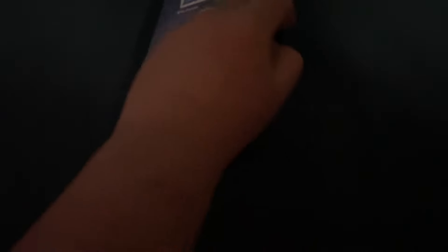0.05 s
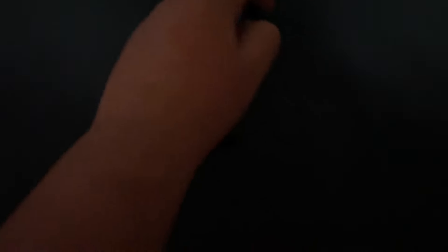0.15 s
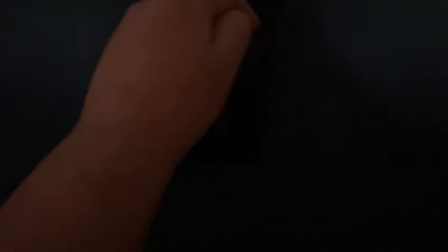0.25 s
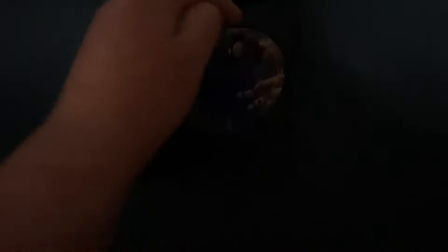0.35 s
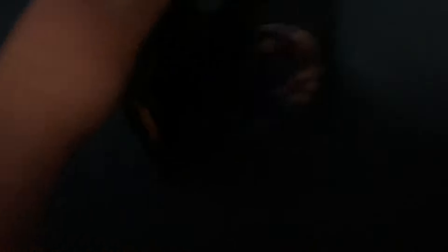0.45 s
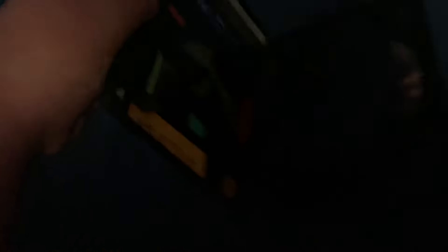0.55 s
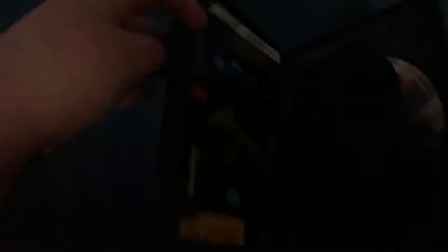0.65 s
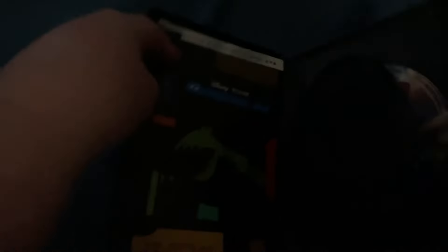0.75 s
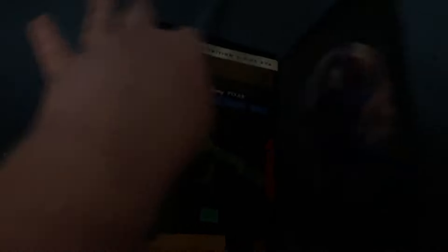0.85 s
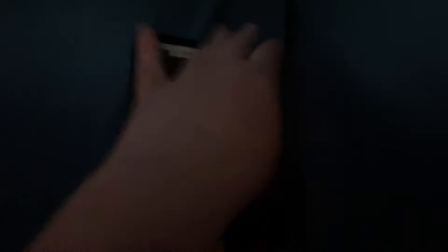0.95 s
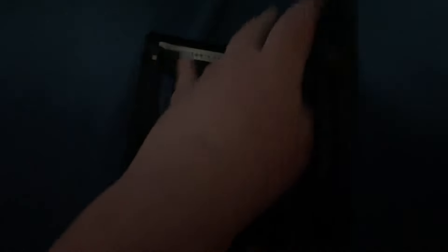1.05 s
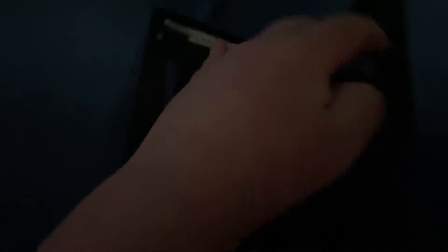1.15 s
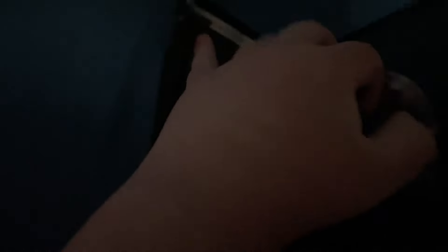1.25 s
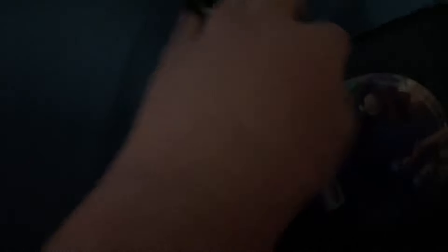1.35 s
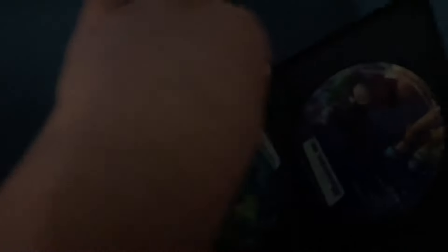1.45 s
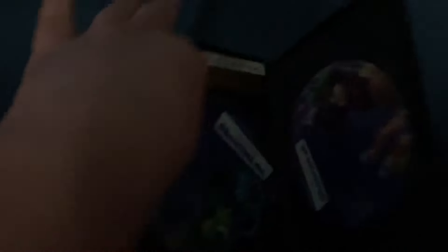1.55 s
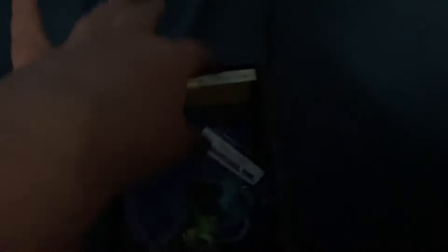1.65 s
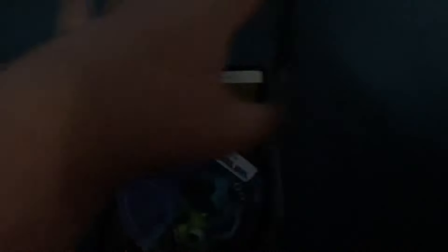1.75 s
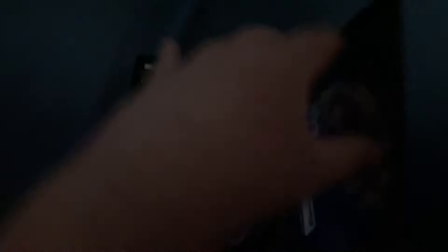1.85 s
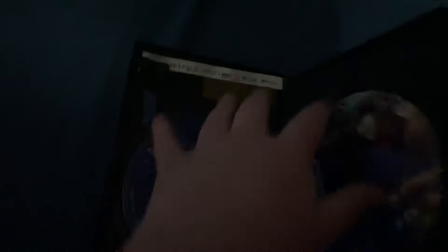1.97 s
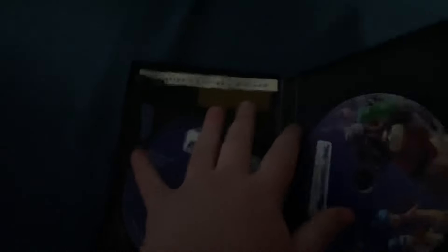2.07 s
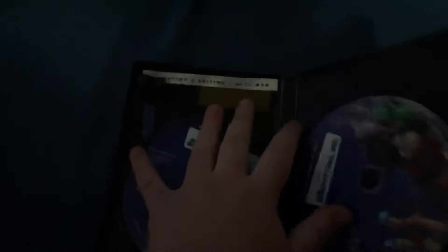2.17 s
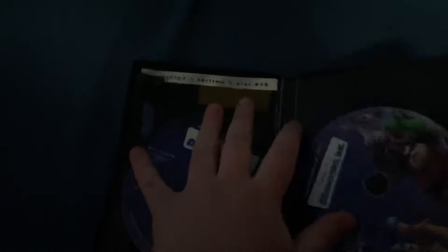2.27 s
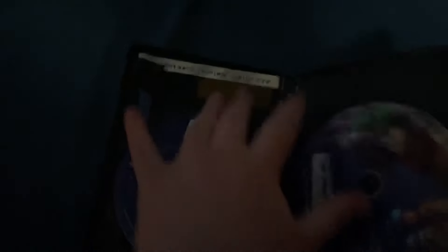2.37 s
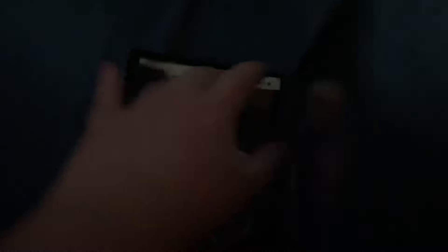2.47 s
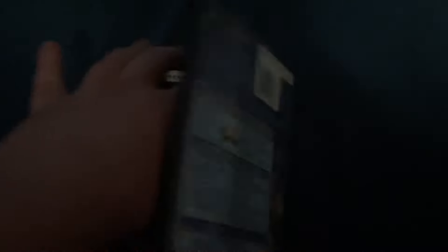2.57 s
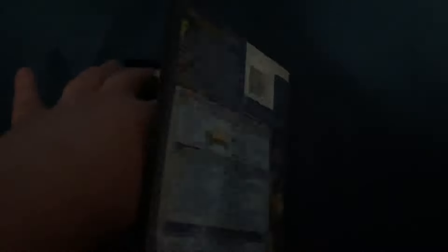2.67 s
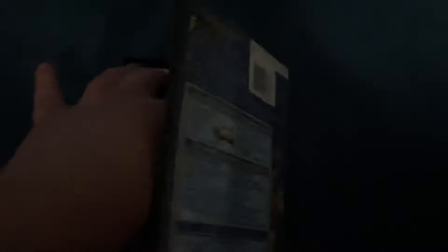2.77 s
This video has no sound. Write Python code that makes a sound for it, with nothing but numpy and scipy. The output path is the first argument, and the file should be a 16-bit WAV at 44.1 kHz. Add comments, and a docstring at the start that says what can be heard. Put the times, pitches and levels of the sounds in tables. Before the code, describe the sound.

Plastic disc case snapped open and handled up close, with sharp clicks, rattles and soft rubbing

```python
"""Opening and handling a plastic disc case close to a stereo camera in a quiet room.
From the outset filtered noise gives microphone hiss, a sine whines faintly at the top of hearing,
and slip-modulated noise is skin rubbing on plastic over a low rumble of the grip.
The latch and hub snaps, knocks and rattles follow as noise-driven shell modes, with damped thuds
and rough scrapes; after one second bright fluttering noise is fingers sliding over the sleeve."""
import sys
import numpy as np
from scipy import signal
from scipy.fft import rfft, irfft
from scipy.io import wavfile
from scipy.ndimage import uniform_filter1d

SR = 44100
rng = np.random.default_rng(int(sys.argv[2]) if len(sys.argv) > 2 else 0)


def linear_from_db(decibels):
    """Turn decibels (scalar or array-like) into linear amplitude factors; 0 gives 1."""
    return 10 ** (np.asarray(decibels, float) / 20)


def generate_wav(signal):
    """Clip the signal to [-1, 1] and save it as 16-bit WAV at the path in sys.argv[1]."""
    frames = np.transpose(np.atleast_2d(signal))
    scaled = np.clip(frames, -1, 1) * 32767
    pcm = np.round(scaled).astype(np.int16)
    wavfile.write(sys.argv[1], SR, pcm)


N = 125685  # samples

# Microphone hiss: spectral density [f/Hz, relative level/dB]
HISS_SPECTRUM = [(30, -32), (81, -15), (200, -8.5), (448, -23.5), (800, -11), (1560, -21.5), (2250, -1.5),
                 (3150, -18.5), (6900, -16), (8300, -21.5), (10000, -19), (12500, -26.5), (13500, -49.5),
                 (20000, -85)]
# Hiss likeness of left and right, limited to -1..1 in use [f/Hz, correlation]
HISS_LIKENESS = [(60, -0.28), (240, 0.96), (950, -1.4), (3770, -0.48), (15000, -0.13)]
HISS_DB = -66  # rms
# Screen whine as the hand shades it [t/s, left rms level/dB, right rms level/dB]
WHINE_LEVELS = [(0, -58, -53.5), (.3, -48.5, -49), (1.2, -49.5, -49.5), (1.5, -59, -59.5),
                (2.0, -53.5, -53.5), (2.5, -66, -63.5), (2.7, -54, -54), (2.76, -76, -70), (2.85, -55, -58)]
WHINE_HZ, WHINE_LEAD_RAD = 15734, 2.4  # the left leads the right

# Hand noise likeness of left and right [f/Hz, correlation]
HAND_LIKENESS = [(60, 0.89), (400, 0.1), (1500, 0.59), (8000, 0.34)]
# Low grip movement [t/s, level/dB]
GRIP_LEVELS = [(0.0, -87.5), (0.27, -81.5), (0.4, -60.5), (0.44, -60), (0.6, -54.5), (0.73, -54.5),
               (0.83, -74.5), (0.96, -58), (1.01, -96.5), (1.11, -68), (1.35, -48), (1.49, -75),
               (1.73, -63), (1.9, -55.5), (2.09, -60), (2.3, -57), (2.42, -52), (2.46, -41), (2.68, -58.5),
               (2.85, -57)]
# Grip rumble: spectral density [f/Hz, relative level/dB]
GRIP_SPECTRUM = [(15, -34.5), (25, -9), (74, -6.5), (207, -12.5), (241, -19), (383, -31.5), (591, -42),
                 (730, -28), (900, -35), (1170, -65.5), (1980, -120)]
# Skin on plastic [t/s, level/dB, spectral tilt/(dB per octave)]
RUB_LEVELS = [(0.0, -71.5, 1.5), (0.28, -76, 1.5), (0.4, -58.5, 1.5), (0.56, -55, -2), (0.74, -59, -1),
              (0.96, -72.5, 1.5), (1.13, -69.5, 9.5), (1.27, -68, 3), (1.49, -77, 2), (1.71, -66.5, -2),
              (1.76, -49, -10.5), (1.86, -65.5, -5), (1.91, -59.5, -1.5), (2.04, -53.5, -2),
              (2.36, -67.5, 0), (2.58, -58.5, -2.5), (2.75, -59.5, -7), (2.85, -69, 1.5)]
# Rough friction: spectral density [f/Hz, relative level/dB]
FRICTION_SPECTRUM = [(150, -26), (250, 4), (482, -15), (642, -14.5), (1320, -11), (3520, -11.5),
                     (4030, -12), (6670, -14), (7900, -18.5), (12200, -19.5), (14000, -39)]
SLIPS_PER_S, SLIP_SPREAD_DB, SLIP_SHARE = 700, 0.5, 0.48  # share of slips in the noise envelope

# Latch and hub snaps, knocks and rattles
# [t/s, nominal peak level/dB, struck region f/Hz, treble gain/dB, chatter time constant/s]
CLICKS = [(.2372, -25, 8000, 1, 0.0011), (.2388, -10.5, 1850, -4, 0.0017),
          (.906, -36.5, 1100, -2.5, 0.0026), (.9118, -15, 3200, 9, 0.0015), (.9145, -16.5, 1300, 0, .002),
          (.9295, -25.5, 3200, -2, .0012), (.2414, -5.5, 1830, -4.5, 0.00074),
          (.244, -16.5, 370, -10, 0.0019), (.2425, -13, 1200, -9.5, .001), (0.63, -52, 820, -10, .002),
          (.582, -34.5, 680, -23, .003), (0.51, -32, 890, -9, .002), (2.255, -47, 10500, 12, .001),
          (2.4, -47, 7300, 17, 0.00091), (0.036, -51, 775, -7, 0.0012), (0.292, -33, 1110, -9, 0.0013),
          (0.496, -26, 5440, 11, 0.00064), (0.529, -35, 960, -13, 0.0009), (0.57, -35.5, 770, -11, 0.0011),
          (0.605, -38.5, 830, 3, 0.0025), (0.648, -36.5, 1670, -11, 0.002),
          (0.678, -26.5, 3900, -2, 0.00089), (0.73, -41, 1470, 1.5, 0.0012),
          (0.954, -3.5, 2610, 12.5, 0.0018), (1.136, -39.5, 3140, -6, 0.0014),
          (1.159, -40.5, 1670, -9.5, 0.0022), (1.265, -49.5, 2760, 1.5, 0.0036),
          (1.292, -51, 2940, 9, 0.0017), (1.336, -40, 1040, -2, 0.00062), (1.354, -32.5, 1640, -9, 0.003),
          (1.364, -31, 1750, 3, 0.0014), (1.491, -37, 3040, 1, 0.0013), (1.526, -52, 2430, -2, 0.0013),
          (1.698, -30.5, 5880, 5, 0.003), (1.71, -16.5, 6560, 4, 0.0011), (1.72, -18.5, 740, 3.5, 0.002),
          (1.731, -23, 2800, 17, 0.0016), (1.752, -29.5, 3860, 10, 0.0014), (1.784, -32, 12200, -2, 0.002),
          (1.794, -35.5, 860, -2, 0.001), (1.855, -41, 9900, 4, 0.0019), (1.883, -24, 3150, 9, 0.0016),
          (1.919, -32.5, 3320, -15, 0.00061), (1.989, -30.5, 3220, -14, 0.0024),
          (2.0, -38, 1010, -15, 0.0011), (2.11, -27, 3280, -5, 0.001), (2.236, -43.5, 870, -8, 0.0018),
          (2.283, -48, 969, -15, 0.0011), (2.335, -45, 2280, -10, 0.0017), (2.385, -41, 961, -2, 0.0023),
          (2.558, -36.5, 990, 19, 0.0035), (2.569, -38, 1080, -7, 0.0017), (2.602, -42, 5350, 13, 0.0016),
          (2.614, -47, 1770, -4, 0.00097)]
# Bending modes of the shell [f/Hz, relative level/dB, t60/s when free]
SHELL_MODES = [(410, 0, .1), (750, -6, .07), (1050, 0, .07), (1320, -4, .07), (1620, -6, .05),
               (1860, 2, .05), (2270, -3, .045), (2650, -3, .04), (3250, -7, .03), (4100, -4, .03),
               (4800, -7, .025), (5600, -8, .02), (6500, -11, .015), (10800, -6, .012)]
# Crack of the impact: spectrum [f/Hz, relative level/dB]
CRACK_SPECTRUM = [(180, -47), (300, -15), (2440, -9), (3640, 0.5), (4160, -3.5), (5610, -6.5), (6960, -7),
                  (8220, -14.5), (10900, -4), (16000, -35.5)]
# Dense small modes of the thin walls [f/Hz, t60/s]
WALL_DECAY = [(300, 0.023), (2000, 0.1), (6000, .04), (12000, .025)]
REGION_OCT, TREBLE_HZ = 0.28, 5000  # width of the struck region, corner of the treble gain
RING_SHARE = 0.37  # the grip shortens the free ring to this share
CRACK_DB, SHUDDER_DB = 1, -13.5  # crack against ring, shudder against first impact
CLICK_DB = -0.5  # added to every click level
TAPS = 4096  # samples per click
LAG_S_PER_DB = 3e-5  # left-right delay per dB of left-right level
# Where the case is [t/s, left minus right level/dB]
CASE_PLACE = [(0, -0.5), (.24, 2.5), (.5, 2.5), (.95, 5.5), (1.35, 1), (1.5, 5.5), (1.75, 1.5), (2.0, 5),
              (2.15, 1.5), (2.5, 2.5), (2.85, 0)]
# Room reverberation [f/Hz, t60/s]
ROOM_DECAY = [(200, 0.41), (1000, 0.19), (4000, 0.21), (12000, .15)]
ROOM_DB = -10  # tail energy relative to the direct case sound

# The case bumps the bed and the hand [t/s, peak level/dB, f/Hz, t60/s at that f]
THUDS = [(0.242, -20.5, 325, 0.065), (0.247, -19, 117.5, 0.089), (0.269, -33.5, 74, 0.11),
         (0.298, -38.5, 55, 0.22), (0.407, -60, 140, 0.14), (0.499, -40.5, 86.4, 0.091),
         (0.559, -48, 76, 0.087), (0.609, -34.5, 64.6, 0.1), (0.654, -27.5, 114.8, 0.11),
         (0.688, -38, 61.9, 0.24), (0.908, -36.5, 185, 0.2), (0.956, -34, 373, 0.085),
         (1.129, -53.5, 97, 0.11), (1.178, -44, 115.6, 0.084), (1.229, -49, 70.8, 0.21),
         (1.278, -43.5, 190, 0.144), (1.324, -35.5, 50.6, 0.1), (1.361, -35, 61.9, 0.1),
         (1.411, -46.5, 59.4, 0.15), (1.458, -45.5, 51.8, 0.11), (1.681, -25, 189, 0.044),
         (1.7, -19.5, 143.5, 0.05), (1.721, -22, 67.8, 0.11), (1.755, -33, 61, 0.18),
         (1.796, -34.5, 164, 0.045), (1.885, -39, 88, 0.071), (1.992, -39.5, 132.4, 0.12),
         (2.043, -40, 62.8, 0.12), (2.115, -41, 146.6, 0.095), (2.246, -43, 195, 0.033),
         (2.279, -41.5, 96, 0.088), (2.332, -38, 189, 0.086), (2.393, -30.5, 117, 0.14),
         (2.427, -30, 64, 0.1), (2.46, -32, 65, 0.21), (2.486, -38, 49, 0.087), (2.511, -26.5, 77, 0.11),
         (2.548, -36, 64.6, 0.078), (2.573, -21.5, 67.3, 0.046), (2.7, -47.5, 123, 0.082)]
# Partials of a thud [multiple of its f, relative level/dB]
THUD_PARTIALS = [(.45, -1.5), (1, 1.5), (2.1, -5.5), (3.3, -12)]
THUD_RISE_S = 0.004

# Rough scrapes of case edges and disc
# [start t/s, length/s, starting level/dB, spectral tilt/(dB per octave)]
SCRAPES = [(0.248, .1, -53.5, -1), (0.957, 0.044, -39, 1), (0.504, .08, -53.5, -2.5),
           (0.605, 0.027, -47, -4), (0.636, .07, -44.5, -3), (0.718, .02, -53, -3.5),
           (0.902, 0.021, -43, -1), (1.134, .05, -56.5, -1), (1.322, 0.061, -57.5, 0),
           (1.683, .07, -43, -1.5), (1.729, 0.081, -46.5, -0.5), (1.879, 0.042, -52, -1.5),
           (1.975, 0.036, -49, -1), (2.025, 0.032, -44, -0.5), (2.114, 0.028, -49, -1),
           (2.251, 0.037, -59.5, -10.5), (2.318, .075, -51, -3.5), (2.405, .03, -56.5, -3.5),
           (2.49, .13, -53.5, -6)]
# Fingers sliding over the smooth sleeve [start t/s, length/s, starting level/dB]
SLIDES = [(1.047, 0.068, -55), (1.313, .07, -61), (1.774, 0.054, -57.5), (1.93, 0.083, -60.5),
          (2.676, .13, -47.5), (2.819, 0.025, -60.5), (2.57, 0.032, -56.5)]
# Smooth sliding: spectral density [f/Hz, relative level/dB]
SLIDE_SPECTRUM = [(400, -18), (730, -0.5), (1900, -28), (2450, -20), (3100, -13), (3950, 2), (4550, -7),
                  (5200, -2.5), (6000, -12.5), (6900, -5.5), (8300, -36), (9300, -3), (10900, 2),
                  (12500, 0), (14000, -14.5)]
SCRAPE_EDGE_S, SLIDE_EDGE_S = 0.006, 0.0092  # rise times

# Microphone response [f/Hz, gain/dB]
MIC_RESPONSE = [(45, -1.5), (7400, 2.5), (8300, -3.5), (9200, 1.5), (13000, -1.5), (14200, -14.5),
                (16500, -18.5), (17500, -69.5)]
LOW_CUT_HZ = 43


def evened(x):
    """Normalisation to unit rms."""
    return x / np.sqrt(np.mean(x ** 2) + 1e-20)


def read(points, hz):
    """Linear interpolation on a logarithmic frequency axis."""
    f, value = np.transpose(points)
    return np.interp(np.log(hz + 1), np.log(f + 1), value)


def add(mix, s, sound):
    """Superposition of a stereo sound on the mix at time s."""
    start = max(round(s * SR), 0)
    part = mix[:, start:][:, :sound.shape[1]]
    part += sound[:, :part.shape[1]]


def coloured(x, spectrum, likeness, tilt=None, size=512):
    """Spectral shaping and partial coherence of a pair; tilt varies the slope in time."""
    overlap = size - size // 4
    hz, t, z = signal.stft(x, SR, nperseg=size, noverlap=overlap)
    c = np.clip(read(likeness, hz), -1, 1)[:, None]
    pair = np.array([z[0], c * z[0] + np.sqrt(1 - c ** 2) * z[1]])
    pair = pair * linear_from_db(read(spectrum, hz))[:, None]
    if tilt is not None:
        octaves = np.log2((hz[:, None] + 200) / 2000)
        pair = pair * linear_from_db(octaves * tilt(t))
    return evened(signal.istft(pair, SR, nperseg=size, noverlap=overlap)[1][:, :N])


def hiss():
    """Stationary Gaussian noise: the self-noise of the microphone."""
    noise = rng.standard_normal((2, N))
    return linear_from_db(HISS_DB) * coloured(noise, HISS_SPECTRUM, HISS_LIKENESS, size=1024)


def whine(t):
    """Pure tone: the line frequency of a tube screen, with an interchannel phase difference."""
    s, left, right = np.transpose(WHINE_LEVELS)
    level = linear_from_db([np.interp(t, s, left), np.interp(t, s, right)])
    lead = np.array([[WHINE_LEAD_RAD], [0]])
    return np.sqrt(2) * level * np.sin(2 * np.pi * WHINE_HZ * t + lead)


def handling(t):
    """Amplitude-modulated low noise: the grip shifts on the case in lumps."""
    wander = evened(uniform_filter1d(rng.standard_normal(N), size=900))
    rumble = coloured(rng.standard_normal((2, N)), GRIP_SPECTRUM, HAND_LIKENESS, size=2048)
    return rumble * linear_from_db(3 * wander) * linear_from_db(np.interp(t, *np.transpose(GRIP_LEVELS)))


def slips():
    """Stick-slip friction: noise whose envelope is partly steady, partly many tiny uneven slips."""
    size = linear_from_db(SLIP_SPREAD_DB * np.minimum(rng.exponential(1, N), 4))
    size = size * (rng.random(N) < SLIPS_PER_S / SR)
    envelope = SLIP_SHARE * evened(uniform_filter1d(size, size=60)) + 1 - SLIP_SHARE
    return envelope * rng.standard_normal((2, N))


def rubbing(t):
    """Sustained friction: skin creeps over plastic with varying level and brightness."""
    s, db, tilt = np.transpose(RUB_LEVELS)
    skin = coloured(slips(), FRICTION_SPECTRUM, HAND_LIKENESS, lambda at: np.interp(at, s, tilt), size=256)
    return skin * linear_from_db(np.interp(t, s, db))


def shell_ring(t, odd, weight):
    """Modal superposition: damped sinusoids, slightly detuned, with opposed phases left and right."""
    m, m_db, t60 = np.transpose(SHELL_MODES)[:, :, None]
    phase = np.array([-.5, .5])[:, None, None] * 1.86 * odd[:len(m), None]
    detuned = m * (1 + 0.011 * odd[-len(m):, None])
    decay = linear_from_db(m_db - 60 * t / (RING_SHARE * t60))
    return (weight(m) * decay * np.sin(2 * np.pi * detuned * t + phase)).sum(1)


def wall_shudder(noise):
    """High modal density: an impulse followed by noise decaying at a rate set by frequency."""
    hz, at, z = signal.stft(noise, SR, nperseg=128)
    z = z * linear_from_db(-60 * at / read(WALL_DECAY, hz)[:, None])
    shudder = signal.istft(z, SR, nperseg=128)[1][:, :TAPS]
    shudder = linear_from_db(SHUDDER_DB) * shudder / np.linalg.norm(shudder[0])
    shudder[:, 0] += 1
    return shudder


def click(db, hz, treble_db, chatter_s, pan_db, seed):
    """Source-filter principle: chattering impacts drive the crack, shell modes and thin walls."""
    t = np.arange(TAPS) / SR
    u = t / chatter_s
    f = np.fft.rfftfreq(2 * TAPS, 1 / SR)

    def weight(at):
        near = np.exp(-.5 * (np.log2((at + 1) / hz) / REGION_OCT) ** 2) + 0.26
        return near * linear_from_db(treble_db / (1 + (TREBLE_HZ / (at + 1)) ** 4))

    ring = rfft(shell_ring(t, seed[3], weight), 2 * TAPS)
    crack = rfft(wall_shudder(seed[1:3]), 2 * TAPS) * weight(f) * linear_from_db(read(CRACK_SPECTRUM, f))
    crack = crack * np.exp(-2j * np.pi * f * .0003)  # the crack lags the ring by 0.3 ms
    body = ring / np.linalg.norm(ring) + linear_from_db(CRACK_DB) * crack / np.linalg.norm(crack)

    push = rfft(seed[0] * u ** 0.87 * np.exp(-u), 2 * TAPS)
    push = push / np.sqrt(uniform_filter1d(abs(push) ** 2, size=30))  # even force over the range
    side = np.array([[-.5], [.5]]) * pan_db
    delay = np.exp(-2j * np.pi * f * (side * LAG_S_PER_DB + .0003))
    both = irfft(body * push * delay)[:, :TAPS]
    # the peak is estimated from the greatest short-term power
    peak = np.sqrt(uniform_filter1d((both ** 2).mean(0), size=90).max() * 6)
    return linear_from_db(db + CLICK_DB - side) * both / peak


def room(x):
    """Reverberation: sparse reflections of random sign, each band decaying at its own rate."""
    taps = np.zeros((2, SR // 2))
    jitter = rng.integers(0, 20, (2, (SR // 2 - 161) // 20))
    at = np.arange(160, SR // 2 - 20, 20) + jitter
    np.put_along_axis(taps, at, rng.choice([-1., 1.], at.shape), 1)
    hz, t, z = signal.stft(taps, SR, nperseg=256)
    z = z * linear_from_db(-60 * t / read(ROOM_DECAY, hz)[:, None])
    tail = signal.istft(z, SR, nperseg=256)[1]
    tail = tail / np.linalg.norm(tail[0])
    return signal.fftconvolve(x.mean(0)[None], tail, axes=1)[:, :N]


def thud(db, hz, t60, seed):
    """Damped bending motion: a few low partials, the higher ones dying sooner."""
    t = np.arange(3 * TAPS) / SR
    x = 0
    for k, (m, p_db) in enumerate(THUD_PARTIALS):
        decay = linear_from_db(p_db - 60 * t * m ** .5 / t60)
        x = x + decay * np.sin(2 * np.pi * hz * m * t + seed[k, :, None] * .5)
    x = x * (1 - np.exp(-t / THUD_RISE_S))
    return linear_from_db(db) * x / abs(x).max()


def stroke(t, start, length, db, sag_db, edge_s):
    """Stroke envelope: a linear rise, a sag in dB over the length, then a slower fall."""
    fall = (start + length - t) / 2 + edge_s
    edges = np.clip(np.minimum(t - start, fall) / edge_s, 0, 1)
    return linear_from_db(db - sag_db * (t - start) / length) * edges


def scraping(t):
    """Rough friction: each scrape swells quickly and sags towards its end."""
    def shapes(at):
        return np.array([stroke(at, s, length, db, 5, SCRAPE_EDGE_S) for s, length, db, _ in SCRAPES])

    def tilt(at):  # mean of the scrapes' tilts, weighted by their envelopes
        shape = shapes(at)
        return np.transpose(SCRAPES)[3] @ shape / (shape.sum(0) + 1e-9)

    envelope = shapes(t).sum(0)
    x = coloured(slips() * envelope, FRICTION_SPECTRUM, HAND_LIKENESS, tilt, size=256)
    return x * np.sqrt(np.mean(envelope ** 2))


def sliding(t):
    """Smooth friction: a bright, slightly fluttering hiss for each slide."""
    envelope = sum(stroke(t, s, length, db, 4, SLIDE_EDGE_S) for s, length, db in SLIDES)
    flutter = linear_from_db(3.1 * evened(uniform_filter1d(rng.standard_normal(N), size=150)))
    return coloured(rng.standard_normal((2, N)) * flutter, SLIDE_SPECTRUM, HAND_LIKENESS) * envelope


def microphone(air):
    """Linear filtering: a low cut, then the microphone's frequency response."""
    air = signal.sosfilt(signal.butter(4, LOW_CUT_HZ, "high", fs=SR, output="sos"), air)
    return irfft(rfft(air) * linear_from_db(read(MIC_RESPONSE, np.fft.rfftfreq(N, 1 / SR))), N)


def scene():
    """Superposition: case, room and hand through the microphone, then hiss and whine."""
    t = np.arange(N) / SR
    case, low = np.zeros((2, N)), np.zeros((2, N))
    pan_db = np.interp(t, *np.transpose(CASE_PLACE))
    hand = (rubbing(t) + sliding(t) + scraping(t)) * linear_from_db(np.outer([.5, -.5], pan_db))
    hand = hand + handling(t)
    noise = hiss()
    for row, seed in zip(THUDS, rng.standard_normal((50, 4, 2))):
        add(low, row[0], thud(*row[1:], seed))
    for row, seed in zip(CLICKS, rng.standard_normal((70, 4, TAPS))):
        # starting 0.6 ms early makes up for the delays inside the click
        add(case, row[0] - .0006, click(*row[1:], pan_db[round(row[0] * SR)], seed))
    air = hand + low + case + linear_from_db(ROOM_DB) * room(case)
    return microphone(air) + noise + whine(t)


def roll_off(x):
    """The treble ends steeply here."""
    return signal.sosfilt(signal.butter(12, 17390, fs=SR, output="sos"), x)


def record(dry):
    """Delivery of the finished mix."""
    return roll_off(dry)


dry = scene()
out = record(dry)
generate_wav(out)
```